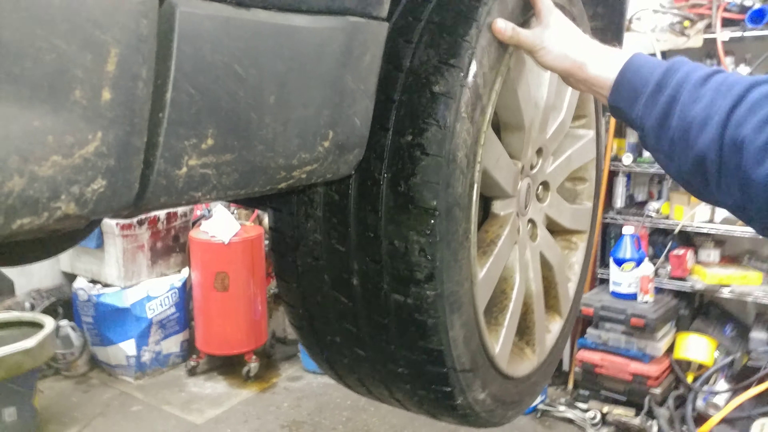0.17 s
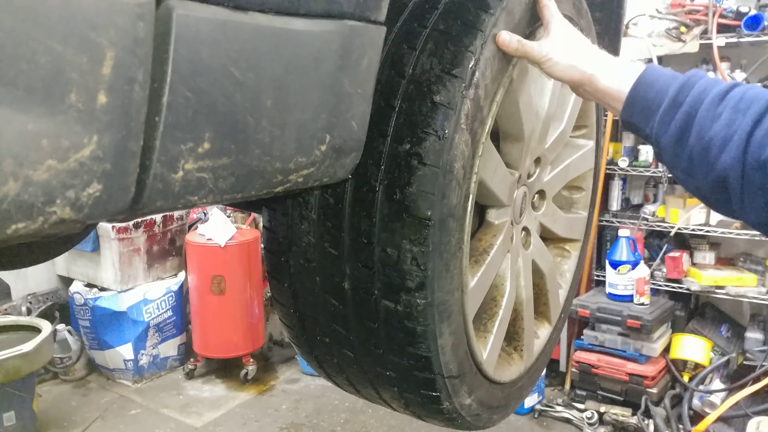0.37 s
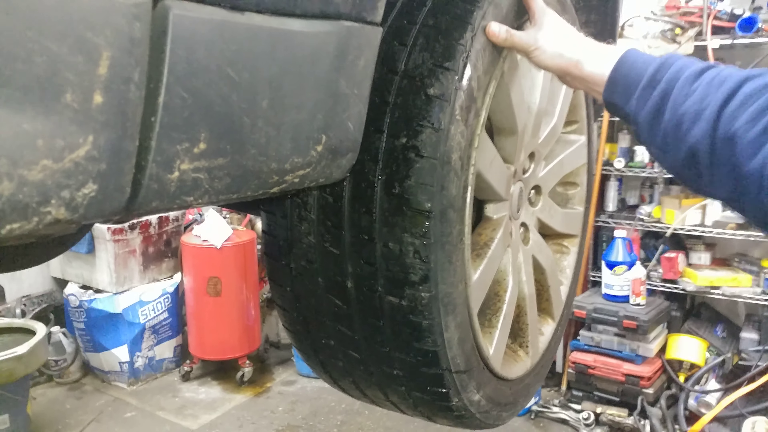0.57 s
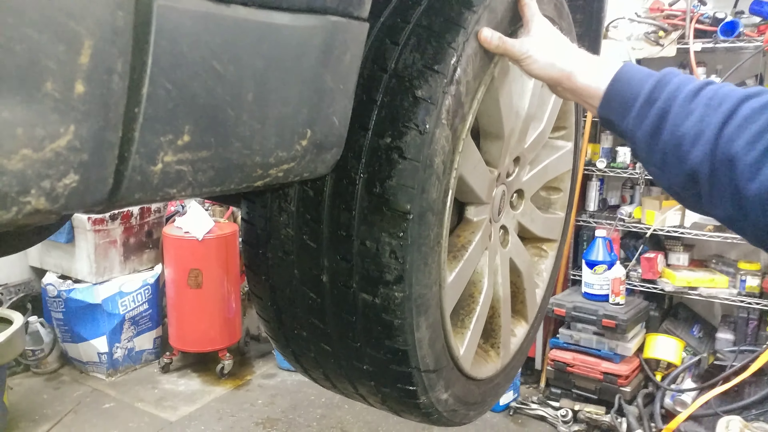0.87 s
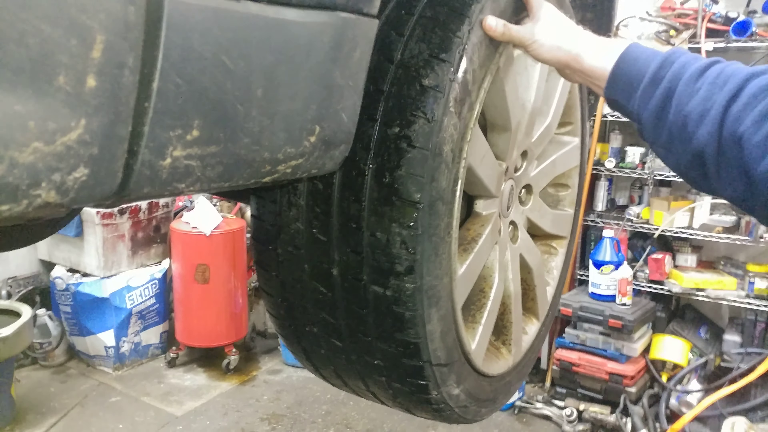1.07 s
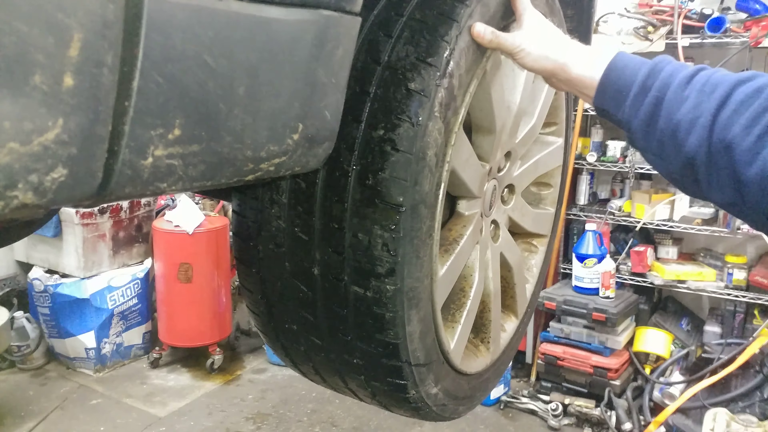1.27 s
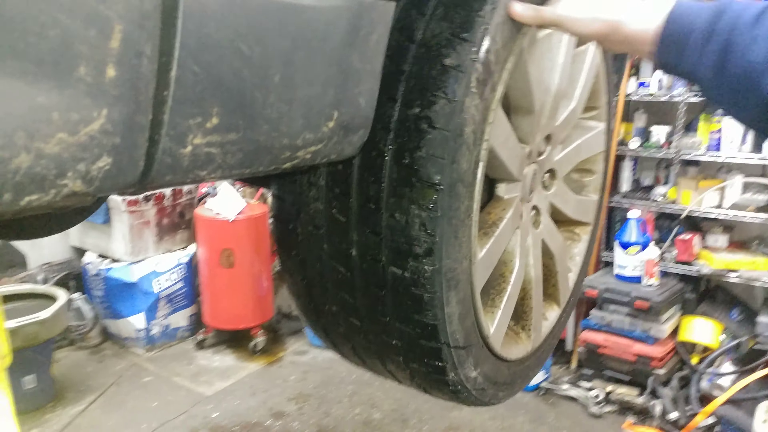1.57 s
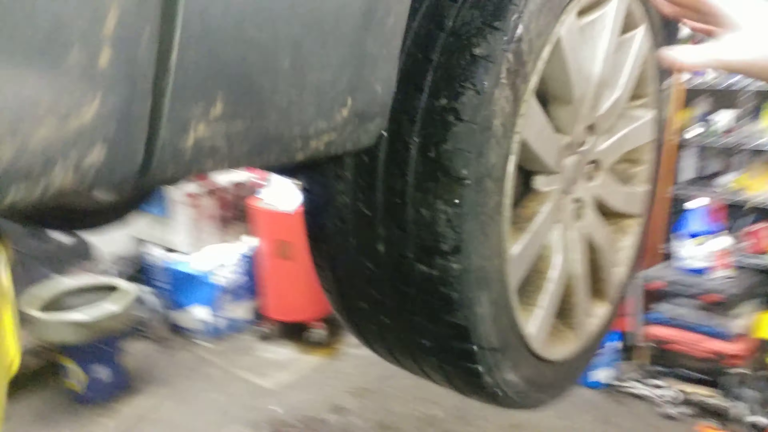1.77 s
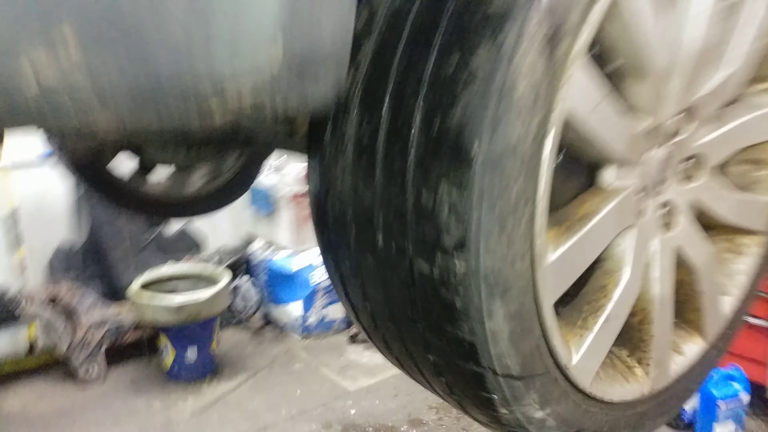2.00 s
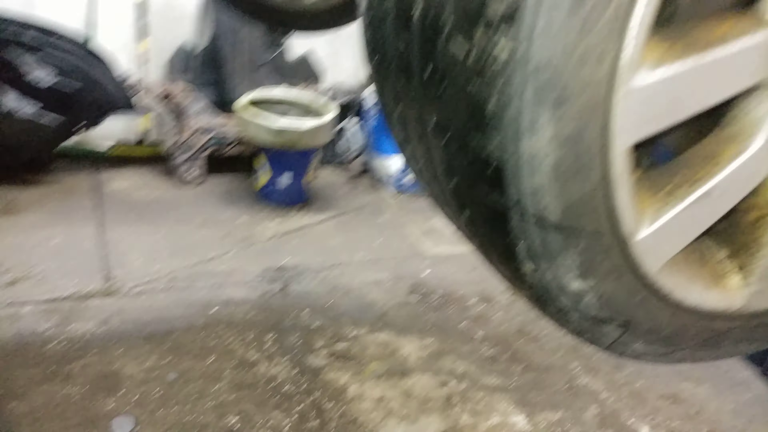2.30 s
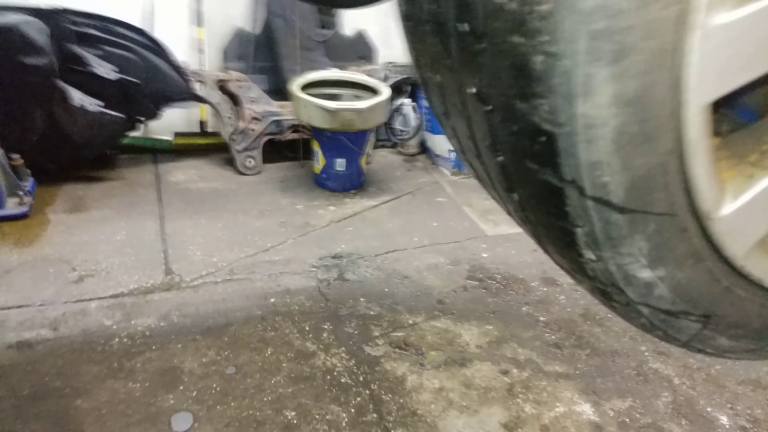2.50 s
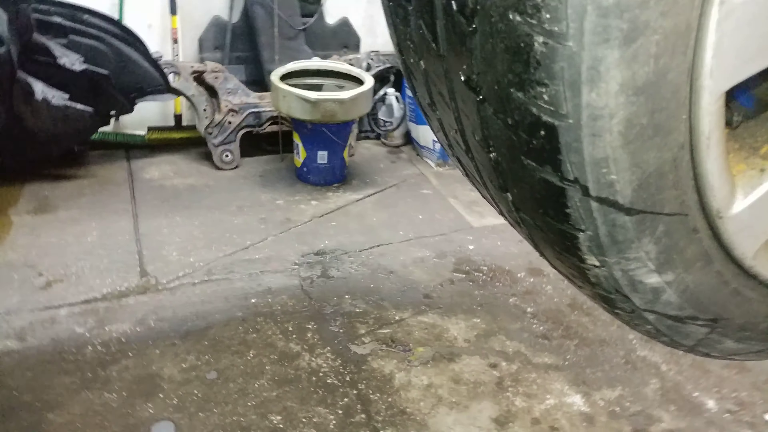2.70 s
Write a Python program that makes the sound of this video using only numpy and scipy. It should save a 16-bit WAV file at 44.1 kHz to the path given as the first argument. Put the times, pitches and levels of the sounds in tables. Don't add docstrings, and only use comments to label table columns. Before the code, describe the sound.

A raised car wheel with hub play is rocked by hand: four ticking hard knocks alternate with dull thuds and rattles, ending in a heavy clunk, then a loud click and light taps on the recorder, close in a workshop.

```python
import sys
import numpy as np
from scipy import signal
from scipy.fft import rfft, irfft, next_fast_len
from scipy.io import wavfile
from scipy.ndimage import uniform_filter1d, minimum_filter1d

SR = 44100
rng = np.random.default_rng(int(sys.argv[2]) if len(sys.argv) > 2 else 0)


def to_wav(sig):
    pcm = np.clip(np.atleast_2d(sig), -1, 1) * 32767
    pcm = np.round(pcm).astype(np.int16)
    wavfile.write(sys.argv[1], SR, pcm.T)


def boost(x):
    u = np.asarray(x, float) / 20
    return 10 ** u


N = 125685

# start_s, peak_db, brightness_db_per_octave
PUSH_KNOCKS = [
    (0.131, -7, 1.5),
    (0.551, -8, 1.5),
    (0.98, -8.5, 1),
    (1.395, -6.5, 2),
]
# start_s, peak_db, brightness_db_per_octave
PLAY_TICKS = [(0.084, -26, 5), (0.103, -13.5, 0), (0.501, -23, 2), (0.519, -21, -3), (0.929, -24.5, 2),
              (0.947, -13, -2.5), (1.347, -25, 4), (1.364, -14, -2.5)]
# start_s, peak_db, brightness_db_per_octave
PULL_THUDS = [(-.11, -24, -3), (.308, -17, -3.5), (.334, -17.5, 6), (.693, -27.5, 5.5), (.712, -21, 7.5),
              (.732, -12.5, -0.5), (.752, -25, 2), (1.122, -31, 8), (1.14, -24.5, 2), (1.162, -12, 1.5),
              (1.76, -30, -0.5)]
# start_s, peak_db, brightness_db_per_octave
END_CLUNKS = [
    (1.6117, -8, 1.5),
    (1.646, -19.5, 0),
    (1.688, -22.5, -1.5),
]
# start_s, peak_db, brightness_db_per_octave
RATTLES = [(-.12, -29, 0), (.133, -41, 6.5), (.306, -30, -4.5), (.36, -29.5, -3), (.374, -29, 5),
           (.720, -30, -3.5), (.788, -34, -4.5), (.812, -46, 7), (1.150, -31, -1.5), (1.222, -32.5, -2),
           (1.586, -34, -2), (1.602, -23.5, 1), (1.664, -36, 9), (1.686, -27.5, 2)]
# start_s, peak_db, pitch_hz, t60_s
PINGS = [(-.05, -24.5, 1444, 0.15), (-.05, -29, 1066, 0.19), (-.05, -38, 341.5, 0.59),
         (.272, -46, 2300, .04), (.375, -21, 1632, 0.15), (0.552, -14.5, 1110, 0.12),
         (.79, -28.5, 1643, 0.09), (.8, -31, 1066, 0.25), (1.123, -35.5, 2680, 0.13),
         (1.151, -20, 3010, 0.15), (1.152, -27, 3180, 0.075), (1.151, -18, 2484, 0.05),
         (0.721, -25, 2890, 0.1), (1.164, -9, 1087, 0.036), (1.224, -29, 2562, 0.13),
         (1.236, -23.5, 1664, .12), (1.247, -28, 2785, .15), (1.603, -19, 3400, .08),
         (1.689, -21, 2573, 0.16), (1.689, -25, 1590, 0.18), (1.75, -28, 1800, 0.088)]

# pitch_hz, level_db, t60_s
HUB_MODES = [(61.4, -25.5, 0.48), (143.5, -15, 1), (198.5, -13, 0.66), (328, -2, 0.2), (480.2, -6.5, 0.33),
             (622.2, 2.5, 0.14), (1066, -27, .55), (1129.5, 4, 0.045), (1640, -2, .04), (1811, 5, 0.05),
             (1880, -2, 0.045), (2960, -12, 0.08), (3300, -11, 0.08)]
# pitch_hz, level_db, t60_s
RIM_MODES = [(940, -9, .35), (1066, -8, .6), (1462, -6, .22), (1590, -11, .35), (1690, -10, .35),
             (1806, -11, .3), (2003, -6, .2), (2169, -8, .24), (2910, -6, .24), (3092, -5, .15),
             (3210, -8, .14), (3340, -9, .17)]
# pitch_hz, level_db, t60_s
BALL_JOINT_MODES = [(182.4, -17.5, 0.9), (492, -6, .12), (597, 0, 0.07), (1096, -7, 0.04),
                    (1407, -13, 0.04), (1792, -15, .05)]
# pitch_hz, level_db, t60_s
KNUCKLE_MODES = [(120.7, -11.5, .4), (192.7, -1.5, 0.6), (227, -2.5, 0.5), (314, 3, 0.07),
                 (466.5, -5, 0.32), (502.5, -0.5, 0.17), (656, 1, 0.099), (724.3, -12, 0.3),
                 (1088, -15.5, 0.26), (1198, -10, 0.36), (1746, -19.5, 0.44)]
# pitch_hz, level_db, t60_s
END_STOP_MODES = [(104, -8, .4), (140, -8, .5), (192, -5, .5), (330, -4, .12), (578, 2, .12), (660, -2, .1),
                  (818, -6, .2), (1163, -10, .3), (1246, -2, .08), (1345, -18, .4), (1754, -1, .06),
                  (484, -1, .22), (738, -6, .3), (2955, -10, .15)]
# pitch_hz, level_db, t60_s
SHIELD_MODES = [(1136, -8, .1), (1345, -14, .25), (1640, -6, .16), (2560, -12, .14), (3010, -14, .14),
                (3700, -16, .12)]

# freq_hz, level_db_per_hz
PUSH_BODY = [(55, -21), (90, 7), (620, 3.5), (1290, -10), (1750, -4.5), (3300, -15), (3700, -28),
             (8000, -52), (16000, -74.5)]
# freq_hz, level_db_per_hz
PULL_BODY = [(53, -35.5), (90, 3.5), (618, 0), (909, -23.5), (1210, -33.5), (9000, -70.5), (11700, -89.5),
             (19800, -120)]
# freq_hz, level_db_per_hz
RATTLE_BODY = [(500, -14.5), (900, -4.5), (2200, -9), (3600, -11), (8000, -24), (16000, -61.5)]
# freq_hz, t60_s
PUSH_DIES = [(150, 0.53), (420, 0.25), (1100, 0.4), (2900, 0.39), (7700, 0.68)]
# freq_hz, t60_s
PULL_DIES = [(150, 0.38), (500, 0.26), (2000, 0.24)]
# freq_hz, t60_s
RATTLE_DIES = [(1000, 0.36), (4000, 0.26), (10000, 0.21)]
# freq_hz, likeness
NEAR_ALIKE = [(60, .8), (300, .9), (900, .65), (2500, .35), (8000, .3)]

# time_s, level_db
SHUDDER_LEVEL = [(0, -53), (0.152, -35.5), (1.5, -35), (1.8, -35), (2.05, -55), (2.45, -52), (2.52, -50.5),
                 (2.85, -44)]
# freq_hz, level_db_per_hz
SHUDDER_COLOUR = [(13, -32.5), (22, -31), (54, 4), (92, -6), (130, -7.5), (170, -40), (290, -120)]

# start_s, peak_db, pitch_hz, t60_s,
# pan_db (left minus right)
TAPS = [(2.374, -39, 800, 0.065, -18), (2.381, -30, 906, 0.045, -10.5), (2.4978, -27, 800, 0.04, -8),
        (2.4998, -20, 380, .025, -8), (2.5045, -31, 640, .06, -8), (2.719, -36.5, 200, 0.056, -8),
        (2.79, -29.5, 460, 0.018, -16.5), (2.821, -45.5, 515, 0.11, -2.5)]
# peak_s, rise_s, fall_s, level_db
RUSTLES = [(0.698, 0.048, 0.059, -56), (0.815, 0.0017, 0.029, -35.5), (1.561, 0.093, .03, -47.5),
           (1.652, 0.036, 0.058, -47.5), (2.386, 0.0063, 0.0043, -42), (2.512, 0.013, 0.026, -61.5),
           (2.63, 0.037, 0.018, -53.5), (2.831, 0.02, .03, -40)]
# freq_hz, level_db_per_hz
CLOTH_COLOUR = [(700, -35), (1300, -3), (4000, -11), (16000, -2.5)]

# start_s, peak_db, pan_db (left minus right), echo_db, brightness_db_per_octave
CLICKS = [
    (1.9434, -2, 11, -38, 0),
    (2.188, -44, 0, -20, 1),
    (2.5751, -14, -2, -22, -9),
]
# delay_s, share
BOUNCES = [(.00045, .5), (.0003, .3), (.0005, .55)]
# centre_hz, width_hz, level_db
CASE_MODES = [(707, 350, 10), (1800, 410, 3.5), (3860, 2100, 5), (6000, 820, 10), (8070, 1900, 13.5),
              (13270, 4400, 4)]

# freq_hz, level_db_per_hz
HUSH_COLOUR = [(55, -26.5), (90, 2.5), (270, -17.5), (520, -15), (1600, -26), (6300, -32.5), (16000, -52)]
# freq_hz, likeness
HUSH_ALIKE = [(60, 1), (950, 0.02), (15000, -0.5)]
# freq_hz, level_db
PORT = [(9700, -0.5), (10700, -32), (11800, -1.5)]
# freq_hz, level_db
MIC = [(5500, 1), (7000, -2), (8600, 6.5), (9700, -2.5), (11800, -8.5), (15500, -7), (16800, -17)]

SCATTER_DB, BEATS_PER_S, ROUGH_HZ, ROUGH_S = 1.5, 75, 1200, 0.03


def unit(x):
    return x / np.sqrt(np.mean(x ** 2) + 1e-20)


def along(points, hz):
    f, value = np.transpose(points)
    return np.interp(np.log(hz + 1), np.log(f + 1), value)


def filtered(x, response):
    m = next_fast_len(x.shape[-1] + 8192)
    spectrum = rfft(x, m) * response(np.fft.rfftfreq(m, 1 / SR))
    return irfft(spectrum, m)[..., :x.shape[-1]]


def add(out, s, x):
    at = round(s * SR)
    x, part = x[:, max(-at, 0):], out[:, max(at, 0):]
    size = min(x.shape[1], part.shape[1])
    part[:, :size] += x[:, :size]


def sides(pan_db):
    return boost([[min(pan_db, 0)], [min(-pan_db, 0)]])


def pair(size, gain_db, alike, dies=((1, 1e9),)):
    hz, t, z = signal.stft(rng.standard_normal((2, size)), SR, nperseg=256)
    fade = boost(-60 * t / along(dies, hz)[:, None])
    noise = signal.istft(z * fade, SR, nperseg=256)[1][:, :size]
    grid = np.linspace(1, SR / 2, 4096)
    norm = np.sqrt(np.mean(boost(gain_db(grid)) ** 2))

    def mid_side(f):
        turn = np.arccos(np.clip(along(alike, f), -1, 1)) / 2
        return boost(gain_db(f)) / norm * [np.cos(turn), np.sin(turn)]

    mid, side = filtered(noise, mid_side)
    return np.array([mid + side, mid - side])


def strikes(events, modes, body, dies, ring_db, body_db, attack_s, unsteady=1, lasts_s=0.5):
    out, t = np.zeros((2, N)), np.arange(round(lasts_s * SR)) / SR
    hz, level, t60 = np.transpose(modes)[..., None]
    beat, share = np.divmod(t * BEATS_PER_S, 1)
    beat = beat.astype(int)
    rough = unsteady * np.clip(hz / ROUGH_HZ, 0, 1) * np.clip(t / ROUGH_S, 0, 1)
    shape = (1 - np.exp(-(t / attack_s) ** 2)) * np.clip((t[-1] - t) * 20, 0, 1)
    for s, db, tilt in events:
        luck = rng.standard_normal((3, len(modes), 1))
        knots = rng.standard_normal((2, len(modes), 40))
        sway = knots[..., beat] * (1 - share) + knots[..., beat + 1] * share
        mode_db = level + SCATTER_DB * luck[0] + tilt * np.log2(hz / 600)
        gain = boost(mode_db - 60 * t / t60 - 5.5 * rough * abs(sway[0]))
        detuned_hz = hz * (1 + 0.006 * unsteady * luck[1])
        phase = 2 * np.pi * detuned_hz * t + (0.6 + hz / 1600) * rough * sway[1]
        lean = (0.17 + hz / 1500) * luck[2] / 2
        even = (gain * np.sin(phase) * np.cos(lean)).sum(0)
        odd = (gain * np.cos(phase) * np.sin(lean)).sum(0)
        ring = np.array([even + odd, even - odd])
        clatter = pair(len(t), lambda f: along(body, f) + tilt * np.log2(f / 600 + 0.01), NEAR_ALIKE, dies)
        add(out, s, boost(db) * shape * (boost(ring_db) * ring + boost(body_db) * clatter))
    return out


def pushes():
    knock = strikes(PUSH_KNOCKS, HUB_MODES, PUSH_BODY, PUSH_DIES, ring_db=-3, body_db=-7, attack_s=0.001)
    rim = strikes(PUSH_KNOCKS, RIM_MODES, PUSH_BODY, PUSH_DIES, ring_db=-9, body_db=-16.5,
                  attack_s=0.012, unsteady=0.6)
    ticks = strikes(PLAY_TICKS, BALL_JOINT_MODES, PUSH_BODY, PUSH_DIES, ring_db=3, body_db=-7.5,
                    attack_s=0.0015, lasts_s=0.3)
    return knock + rim + ticks


def pulls():
    thuds = strikes(PULL_THUDS, KNUCKLE_MODES, PULL_BODY, PULL_DIES, ring_db=-3.5, body_db=-3.5,
                    attack_s=0.002, lasts_s=0.4)
    clunks = strikes(END_CLUNKS, END_STOP_MODES, PUSH_BODY, PULL_DIES, ring_db=-4, body_db=-5,
                     attack_s=0.001, unsteady=0.6)
    return thuds + clunks


def rattle():
    return strikes(RATTLES, SHIELD_MODES, RATTLE_BODY, RATTLE_DIES, ring_db=1.5, body_db=5.5,
                   attack_s=0.0008, lasts_s=0.3)


def pings():
    out, t = np.zeros((2, N)), np.arange(SR // 3) / SR
    for s, db, hz, t60 in PINGS:
        rough = (hz / 1900) ** 2
        knot_at = t * BEATS_PER_S * (1 + rough)
        waver = [np.interp(knot_at, np.arange(120), knots) for knots in rng.standard_normal((2, 120))]
        note = np.sin(2 * np.pi * hz * t + 0.6 * rough * waver[0] + rng.normal(0, 0.8, (2, 1)))
        decay = boost(db - 60 * t / t60 + 1.6 * rough * waver[1])
        add(out, s, decay * (1 - np.exp(-t / 0.002)) * note)
    return out


def wheel():
    lag_s = 9e-5
    x = pushes() + pulls() + rattle() + pings()
    return filtered(x, lambda f: np.exp([-1j * np.pi * f * lag_s, 1j * np.pi * f * lag_s]))


def shudder():
    s, db = np.transpose(SHUDDER_LEVEL)
    level = boost(np.interp(np.arange(N) / SR, s, db))
    return level * unit(pair(N, lambda f: along(SHUDDER_COLOUR, f), [(50, 0.84)]))


def clicks():
    out, t = np.zeros((2, N)), np.arange(SR // 5) / SR
    lead = 20

    def case(f):
        return sum((-1) ** k * boost(db) * 1j * f * w / (c * c - f * f + 1j * f * w)
                   for k, (c, w, db) in enumerate(CASE_MODES))

    for (s, db, pan_db, echo_db, tilt), (delay_s, share) in zip(CLICKS, BOUNCES):
        blow = boost(-60 * t / 0.0006) * (2 + 0.4 * rng.standard_normal((2, len(t))))
        blow = np.pad(blow, ((0, 0), (lead, 0)))[:, :len(t)]

        def struck_case(f):
            bounce = 1 + share * np.exp(-2j * np.pi * f * delay_s)
            return case(f) * (1 + 1j * f / 1500) ** (tilt / 6 + 1.11) * bounce

        snap = filtered(blow, struck_case)
        echo = pair(len(t), lambda f: along(HUSH_COLOUR, f) + along(PORT, f) + 1.5 * np.log2(f / 600 + 0.01),
                    HUSH_ALIKE, [(600, 0.15), (4000, 0.08), (9000, 0.03)])
        add(out, s - lead / SR, boost(db) * (snap / abs(snap).max() * sides(pan_db) + boost(echo_db) * echo))
    return out


def taps():
    out, t = np.zeros((2, N)), np.arange(SR // 5) / SR
    for s, db, hz, t60, pan_db in TAPS:
        thump = boost(-60 * t / (0.5 * t60)) * np.sin(2 * np.pi * hz * t)

        def puff_db(f):
            slope = np.where(f > hz, 15, 2)
            return -np.minimum(slope * abs(np.log2((f + 1) / hz)), 40)

        puff = pair(len(t), puff_db, NEAR_ALIKE, [(300, t60)])
        add(out, s, boost(db) * sides(pan_db) * (1 - np.exp(-t / 0.0007)) * (2.2 * thump + 1.5 * puff))
    return out


def rustle():
    t = np.arange(N) / SR
    swell = sum(boost(db) * np.exp(-0.5 * ((t - s) / np.where(t < s, rise, fall)) ** 2)
                for s, rise, fall, db in RUSTLES)
    grain = boost(3.1 * unit(uniform_filter1d(rng.standard_normal(N), size=60)))
    return swell * unit(grain * pair(N, lambda f: along(CLOTH_COLOUR, f), [(1000, 0.3)]))


def hush():
    return boost(-54) * pair(N, lambda f: along(HUSH_COLOUR, f), HUSH_ALIKE)


def scene():
    air = wheel() + shudder() + taps() + rustle() + hush()
    return filtered(air, lambda f: boost(along(PORT, f))) + clicks()


def band_limit(x):
    return signal.sosfilt(signal.butter(12, 16960, fs=SR, output="sos"), x)


def record(dry):
    hiss = boost(-74) * rng.standard_normal(dry.shape)
    x = filtered(dry, lambda f: boost(along(MIC, f))) + hiss
    x = filtered(x, lambda f: np.clip((16950 - f) / 600, 0, 1))
    need = minimum_filter1d(0.99 / np.maximum(abs(x).max(0), 0.99), size=260)
    return band_limit(x * uniform_filter1d(need, size=130))


dry = scene()
out = record(dry)
to_wav(out)
```